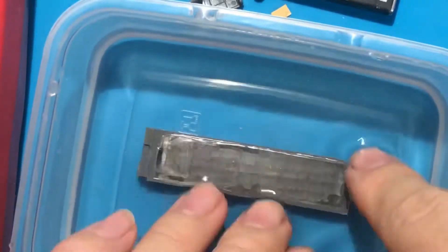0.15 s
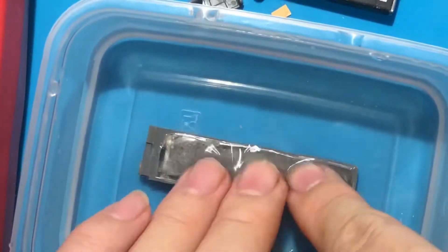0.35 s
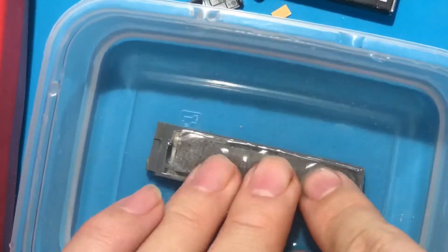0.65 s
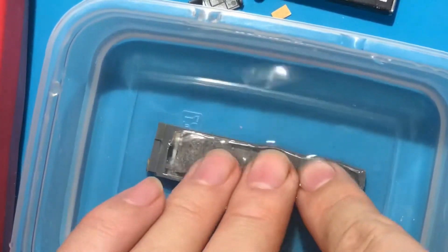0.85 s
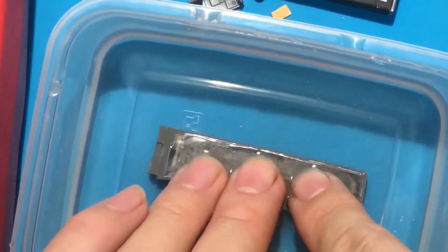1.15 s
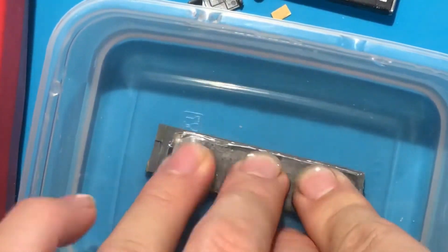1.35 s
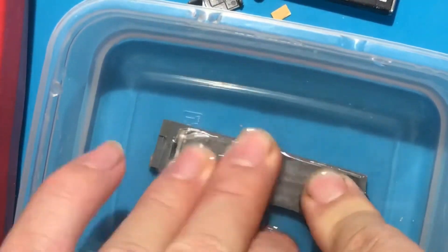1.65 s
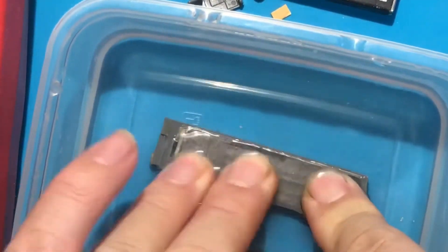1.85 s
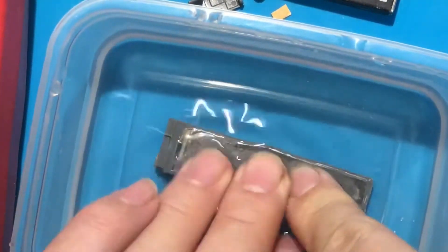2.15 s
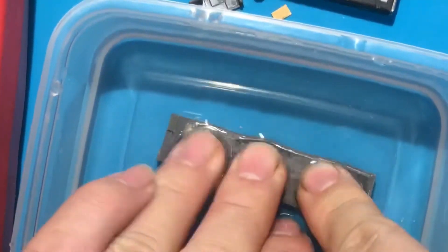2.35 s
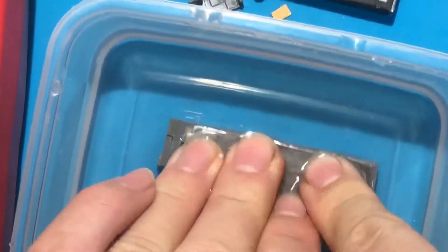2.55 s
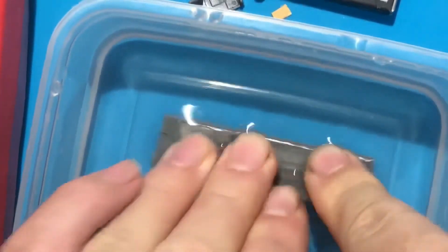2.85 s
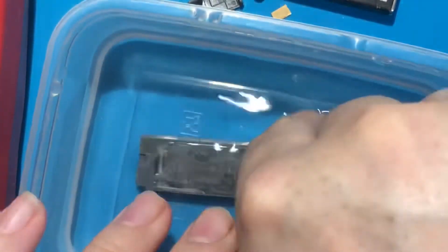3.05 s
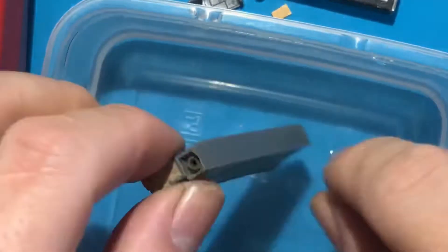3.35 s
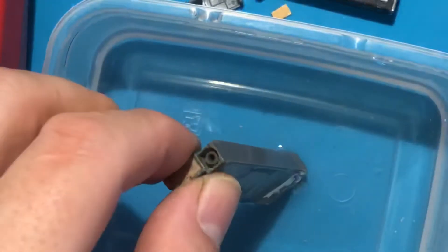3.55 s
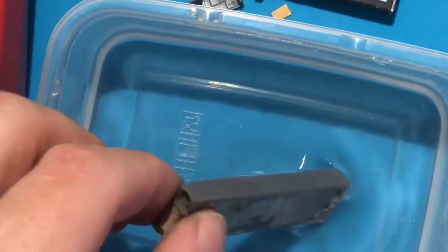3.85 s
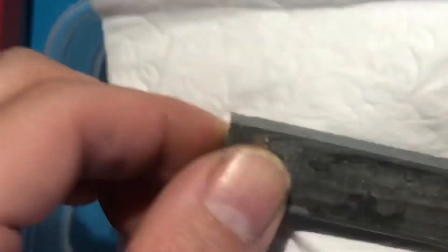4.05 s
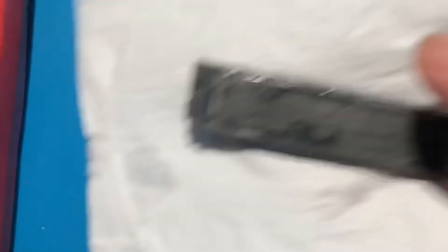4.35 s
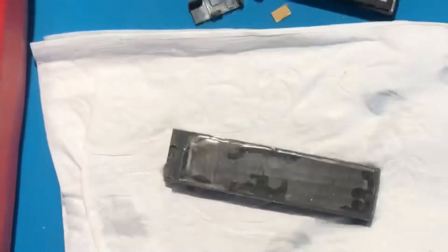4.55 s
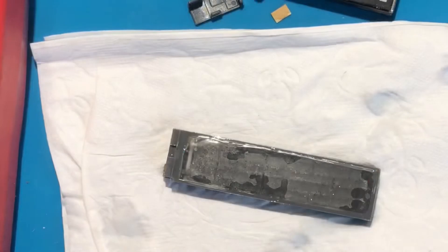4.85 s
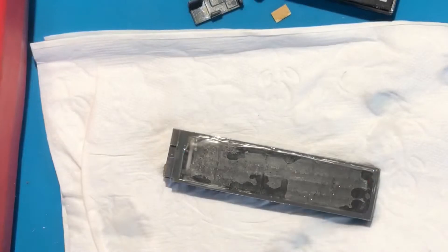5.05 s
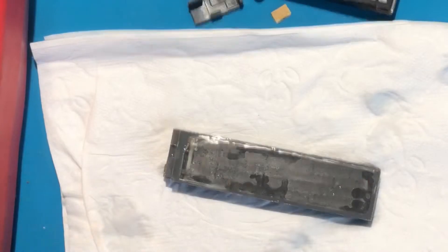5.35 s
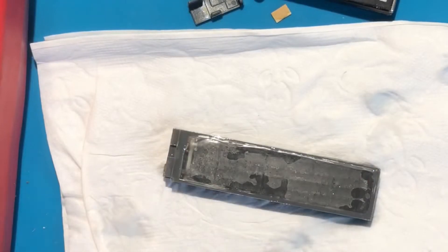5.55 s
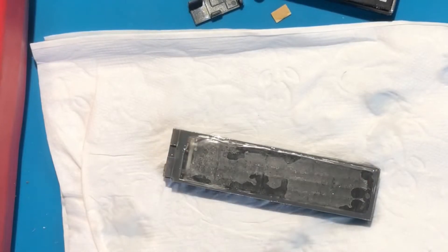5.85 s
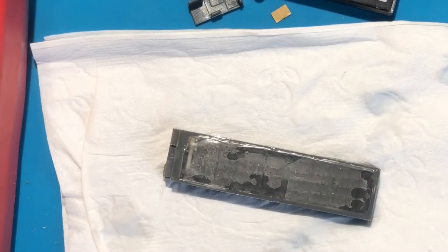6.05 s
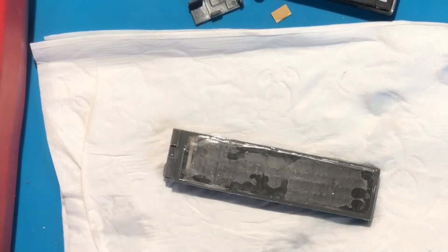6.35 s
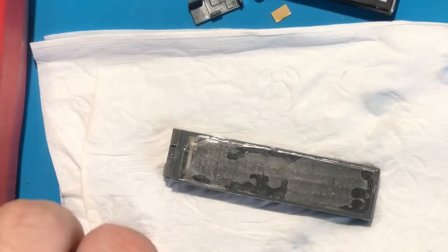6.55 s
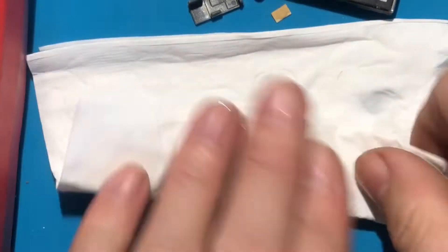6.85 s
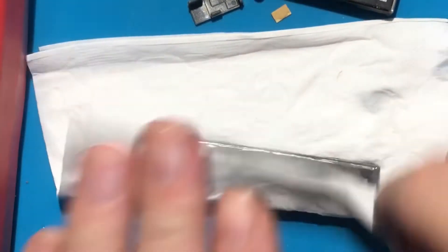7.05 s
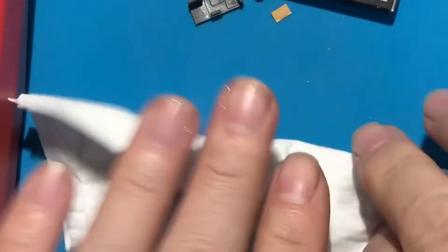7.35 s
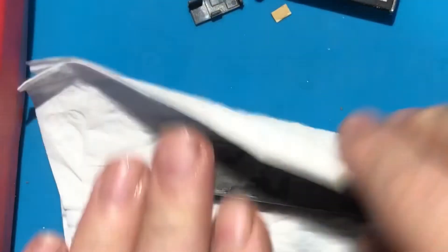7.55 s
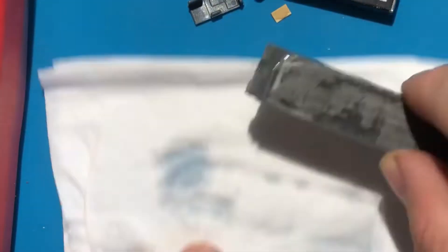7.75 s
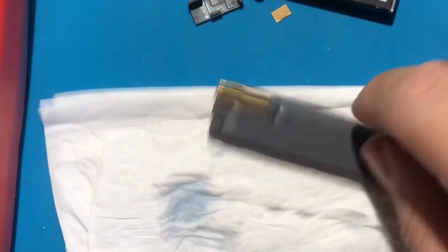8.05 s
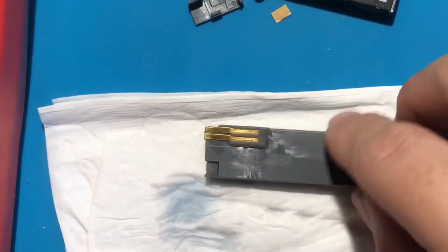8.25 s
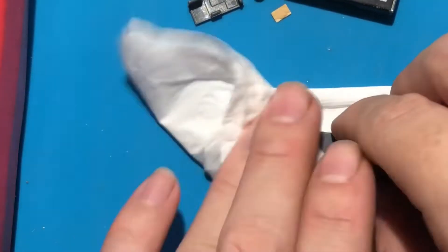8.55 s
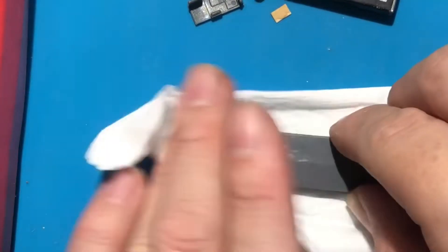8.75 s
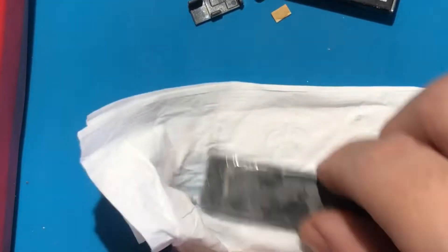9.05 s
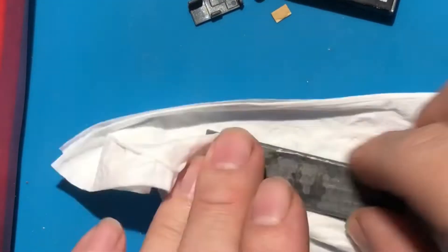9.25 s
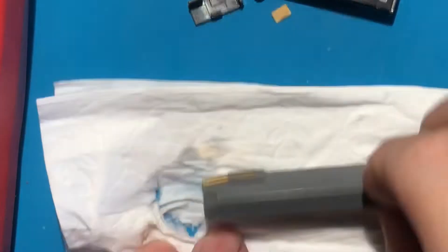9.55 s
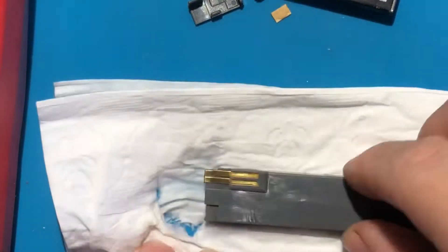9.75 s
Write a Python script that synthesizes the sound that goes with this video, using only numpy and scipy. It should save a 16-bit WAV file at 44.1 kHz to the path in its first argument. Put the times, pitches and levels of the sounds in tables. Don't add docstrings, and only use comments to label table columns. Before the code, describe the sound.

A very quiet, close, dry room with faint low hum and soft hiss. From 0 to 2.9 s wet fingers on a small pack in a plastic tub give barely audible thin ticks, soft skin slips and dull little taps. At 2.9 s a firmer hollow plastic clack and scrape; at 3.3 s a bright tick. Around 3.9-4.1 s wet rubbing, then solid bench thumps with drags at 4.3 and 4.55 s. At 5.04 s a very loud, bright plastic snap, and at 5.38 s a second, duller and more rattling, with a low bump. From 5.7 to 7.5 s come paper crackles, light rustles, knocks at 6.4, 6.6, 6.9 and 7.2 s and a click at 7.5 s. Soft bumps near 8 s, then choppy towel rubbing from 8.4 s, a heavy low thud at 9.03 s, faint squeaks around 9.3-9.5 s and a dull knock at 9.65 s. All sounds are cut short, hurried but unpitched-up.

```python
import sys
import numpy as np
from scipy import signal
from scipy.fft import rfft, irfft
from scipy.io import wavfile
from scipy.ndimage import uniform_filter1d

SR = 44100
rng = np.random.default_rng(int(sys.argv[2]) if len(sys.argv) > 2 else 0)


def decibels_to_gain(level_db):
    exponent = np.asarray(level_db, float) / 20
    return 10 ** exponent


def transcribe(signal):
    frames = np.atleast_2d(signal).T
    limited = np.clip(frames, -1, 1)
    pcm = np.round(limited * 32767).astype(np.int16)
    wavfile.write(sys.argv[1], SR, pcm)


N = 437472

SLICE, FADE, START, HANDOVER = 0.032, 0.0075, 0.011, 0.0058
KEPT = round((SLICE + FADE) * SR)
SLICE_T = np.arange(KEPT) / SR

# freq_hz, level_db_per_hz
ROOM_COLOUR = [(15, -34), (40, -7), (114, -3), (163, -7.5), (226, -7.5), (304, -10), (669, -17),
               (1430, -24.5), (2150, -26.5), (3150, -28), (9000, -32.5), (15800, -32.5)]
# time_s, level_db
ROOM_LEVEL = [(0.0, -80.5), (9.5, -77), (9.92, -78.5)]
# pitch_hz, level_db
HUM_TONES = [(199.2, -73.5), (1470, -94.5)]
# freq_hz, level_db_per_hz
WHINE_COLOUR = [(8650, -120), (9000, -99), (9350, -120)]

# start_s, peak_db
TICK_EVENTS = [(.184, -64), (.3446, -65), (.5686, -64), (.6958, -62), (.8245, -63), (.9517, -62),
               (1.3364, -61), (1.4636, -62), (1.5354, -64), (1.7604, -65), (2.0467, -63), (2.361, -63),
               (2.7447, -65), (6.0716, -60), (0.3122, -60), (0.4394, -61), (0.7592, -62), (1.5928, -60),
               (3.2625, -38), (3.3897, -53.5), (3.5129, -63), (3.8696, -63), (5.7804, -56), (5.7865, -54),
               (5.7947, -52), (5.8024, -54), (5.8138, -53), (5.8296, -54), (6.4108, -58), (6.4582, -65),
               (6.736, -52), (7.5747, -58), (7.535, -64), (8.5634, -63)]
# low_hz, high_hz
WET_TICK_BAND = [13800, 15900]
WET_UNTIL_S = 4

# start_s, hiss_db, tub_db
SLIPS = [(.012, -86, -82), (.044, -82, -76), (.172, -82, -78), (.204, -82, -75.5), (.428, -95, -81),
         (.524, -87, -79), (.844, -92, -78), (.876, -81, -73), (1.036, -85, -70.5), (1.804, -73, -64.5),
         (2.188, -76.5, -74), (2.54, -84, -79), (3.788, -69, -88)]
# freq_hz, level_db_per_hz
SLIP_COLOUR = [(4200, -25), (4900, -9), (6100, -2), (6900, -20)]
# freq_hz, level_db_per_hz
TUB_COLOUR = [(700, -19), (1450, 4.5), (1800, -16), (2120, 0.5), (2700, -21)]

# start_s, peak_db, centre_hz
CRACKLE_EVENTS = [(2.4025, -55, 2050), (2.4035, -62, 5400), (2.4135, -59, 2000), (7.177, -49, 2800),
                  (7.178, -58, 6800), (6.7362, -36, 11000), (5.3915, -36, 3800), (3.328, -58, 9000),
                  (3.3285, -60, 2000), (3.83, -56, 2400), (4.403, -54, 3000), (4.418, -60, 3000),
                  (4.4235, -57, 3200), (4.445, -58, 800), (5.9198, -57, 5000), (5.9448, -52, 7000),
                  (5.982, -55, 6000), (6.1635, -60, 3500), (6.185, -60, 2800), (6.2331, -51, 8000),
                  (6.2495, -51, 7500), (6.2755, -51, 6200), (6.295, -50, 8500), (6.4107, -52, 6500),
                  (6.7125, -58, 13000), (6.8053, -58, 2500), (6.8348, -49, 4700), (6.929, -42, 7000),
                  (7.3137, -61, 12000), (7.34, -60, 8000), (7.354, -60, 2500), (7.4838, -56, 8000),
                  (7.5746, -52, 7200), (7.9936, -64, 11000), (8.9825, -58, 3000), (8.983, -58, 8500),
                  (9.0522, -58, 5000), (9.208, -62, 5200), (9.2468, -64, 4500), (2.9255, -50, 4000),
                  (4.9188, -42, 3000), (6.6846, -41, 4200), (6.0015, -48, 2200), (6.311, -57, 7500),
                  (6.265, -57, 4000), (6.333, -57, 3500), (9.9038, -60, 1200), (8.505, -58, 1500),
                  (9.6459, -58, 4500), (4.205, -60, 1300)]
# start_s, level_db, pitch_hz, overtone_step_db
SQUEAL_EVENTS = [
    (5.1, -54, 1170, -14),
    (9.292, -68, 1370, -1),
    (9.356, -74, 1350, -1),
    (9.388, -72, 1370, -3),
    (9.484, -70, 1340, -2),
    (4.62, -66, 1400, -14),
]
SQUEAL_WIDTH_HZ = 130

# start_s, level_db, pitch_hz
SWAY_EVENTS = [(1.644, -60.5, 78), (4.268, -39.5, 115), (5.42, -50, 110), (6.156, -63, 150),
               (6.668, -54, 130), (6.828, -62, 100), (7.372, -62, 130), (7.436, -60, 140),
               (7.724, -63, 140), (9.644, -58, 60), (9.068, -70, 200), (4.3, -61, 118), (4.556, -40.5, 165),
               (9.516, -58.5, 70), (5.044, -55, 147), (5.132, -54, 45), (5.228, -64, 53), (5.292, -58, 56),
               (5.388, -45.5, 52), (5.42, -39.5, 61.6), (5.452, -58, 39.7), (5.772, -61, 104),
               (5.996, -61.5, 108), (6.412, -55.5, 109), (6.444, -60, 124), (6.508, -60.5, 192),
               (6.7, -53, 211), (6.796, -57.5, 126), (6.929, -52.5, 198), (7.18, -56, 116),
               (7.244, -53.5, 114), (7.276, -46.5, 116), (7.884, -46, 100), (7.948, -54, 42),
               (8.076, -44, 173.5), (8.14, -53, 59.5), (8.844, -56, 47.3), (9.612, -56, 44.7),
               (9.644, -57, 182)]
# freq_hz, level_db_per_hz
LEAN_COLOUR = [(20, -14), (40, 3), (75, -6.5), (120, -1.5), (170, -9), (300, -37)]
# freq_hz, level_db_per_hz
BOARD_COLOUR = [(150, -29), (240, 9), (380, 4.5), (600, -2.5), (1000, -24)]

# start_s, thud_peak_db, thud_hz, shell_peak_db, shell_hz
KNOCK_EVENTS = [(.145, -63, 400, -73, 800), (.44, -69, 300, -68, 1000), (1.361, -70, 450, -69, 790),
                (1.495, -60, 300, -73, 700), (2.021, -61, 350, -65, 744), (0.523, -53, 398, -60, 737),
                (1.791, -52, 314, -64, 696), (2.1311, -53, 318, -69, 710), (2.5304, -57, 328, -63, 825),
                (2.9251, -33, 380, -31.5, 1420), (2.9502, -44.5, 339, -47.5, 1430),
                (3.5847, -54, 404, -56, 960), (4.2745, -30, 300, -44, 1450), (4.266, -40, 200, -56, 700),
                (4.5545, -38, 330, -46, 700), (4.5614, -30, 444, -40.5, 830),
                (5.6373, -49, 527, -53.5, 1580), (6.417, -39, 343, -50.5, 865),
                (6.9286, -40, 222, -68, 1500), (6.5772, -31.5, 407, -50, 1135),
                (7.1763, -39, 318, -42, 1256), (7.1855, -46, 300, -52, 700), (7.171, -50, 250, -62, 900),
                (6.8055, -52, 380, -70, 900), (9.0312, -50, 600, -36, 850), (7.9162, -60.5, 637, -52, 700),
                (8.0775, -41, 290, -56, 900), (9.0339, -20, 345, -46, 912),
                (9.0577, -28.5, 289, -57.5, 705), (9.6503, -34, 263, -75, 1370),
                (4.2935, -35, 150, -56, 700)]
# start_s, crack_peak_db, thud_peak_db, shell_peak_db, shell_hz
CLICK_EVENTS = [(2.386, -62, -57, -55, 1990), (2.7254, -63, -55, -46.5, 1440),
                (2.801, -53.5, -57, -56, 1450), (2.9332, -47.5, -41, -37, 1390),
                (3.2949, -57, -77, -55, 1100), (3.2955, -70, -80, -54, 2900),
                (4.9182, -41, -55, -40.5, 2560), (5.3637, -69.5, -53.5, -46.5, 1700),
                (5.3914, -17, -30, -20, 900), (6.0013, -61, -46, -46.5, 740),
                (6.6842, -48, -42.5, -38, 1500), (6.8344, -63, -69, -64, 2395),
                (6.893, -66, -64, -50, 1150), (6.9292, -50, -70, -69, 2340),
                (7.012, -50.5, -70.5, -58.5, 1750), (7.4974, -35.5, -58.5, -48, 1730)]
KNOCK_CRACK_DB, CLICK_THUD_HZ = -35, 560

# start_s, crack_db, crack_t60_s, rattle_db
SNAP_EVENTS = [
    (5.0436, -4.5, 0.0088, -60.5),
    (5.384, -4, 0.005, -35),
]
# pitch_hz, level_db, t60_s
LID_MODES = [
    [(352, -33, 0.062), (615, -20, 0.036), (878, -16.5, 0.025), (1400, -2.5, 0.009), (1706, -24, 0.017),
     (6270, -48, .015)],
    [(345, -15, 0.034), (720, -22, 0.05), (1050, -16.5, .018), (1892, -24, 0.022), (3160, -31.5, 0.018)],
]
# delay_s, peak_db
CATCH_BLOWS = [
    [(.0003, -17)],
    [(.0004, -13), (.0008, -10), (.0013, -17)],
]
# freq_hz, level_db_per_hz
CRACK_COLOURS = [
    [(1060, -19), (1800, -16), (2430, -14.5), (4290, -2.5), (5440, -8), (6300, 2), (7420, -13), (8670, -4),
     (12600, -12.5), (16000, -8.5)],
    [(880, -30.5), (1500, -14), (4000, -1), (5400, 0), (7610, 3), (8300, 2), (8700, -12.5), (10900, -20),
     (11900, -20.5), (16000, -26.5)],
]

# freq_hz, level_db_per_hz
FIBRE_COLOUR = [(900, -24), (1700, -7), (2600, 0), (4200, -2.5), (5800, -4.5), (7500, -23.5)]
# freq_hz, level_db_per_hz
CRINKLE_COLOUR = [(4500, -26.5), (6300, -1.5), (10000, -2.5), (15600, -2.5), (16000, -6)]
# start_s, end_s, fibres_db, crinkle_db
STROKE_EVENTS = [(3.87, 3.9, -73, -75), (4.1, 4.15, -72, -77), (4.32, 4.42, -78, -78),
                 (4.45, 4.52, -73, -72), (4.52, 4.54, -72, -68), (5.76, 5.82, -68, -72),
                 (5.92, 5.98, -69, -71), (6.21, 6.33, -66.5, -68.5), (6.34, 6.43, -73.5, -76.5),
                 (7.58, 7.64, -73, -74.5), (8.19, 8.25, -83.5, -78), (8.42, 8.51, -75, -71),
                 (6.69, 6.71, -80, -80), (9.475, 9.5, -67.5, -71), (9.51, 9.6, -81, -80),
                 (8.74, 8.8, -73, -74), (8.93, 9.06, -74, -72), (9.34, 9.4, -71.5, -78),
                 (9.41, 9.47, -73.5, -75.5)]
# start_s, fibres_db, crinkle_db
WET_RUB_EVENTS = [(0.044, -77.5, -75.5), (1.804, -75.5, -73), (2.188, -79, -84), (2.7, -80, -80),
                  (2.924, -68, -86), (3.308, -76.5, -76), (3.82, -75, -80), (3.948, -60, -62.5),
                  (3.98, -77.5, -77), (4.044, -70, -71), (3.916, -70, -70), (4.076, -58, -66)]
# start_s, fibres_db, crinkle_db
DRY_RUB_EVENTS = [(4.919, -61, -70), (5.044, -52, -50), (5.133, -66, -75), (5.26, -70.5, -70),
                  (5.42, -61.5, -70), (5.868, -68, -74), (5.996, -61.5, -69.5), (6.028, -68.5, -71.5),
                  (6.156, -73.5, -81), (6.476, -66, -72), (6.636, -71, -75), (6.685, -62, -76),
                  (6.732, -56, -49), (6.828, -67.5, -70), (6.86, -71, -73), (6.929, -59, -65),
                  (7.116, -73.5, -74), (7.18, -82, -72), (7.148, -75, -79), (7.308, -78, -73),
                  (7.34, -80, -78), (6.796, -77, -86), (6.892, -77, -78), (6.956, -80, -79),
                  (5.836, -76, -80), (8.012, -84, -79), (7.98, -84, -82), (8.076, -80, -80),
                  (8.524, -81, -80), (8.716, -79, -80), (9.164, -78, -80), (9.196, -75, -78),
                  (9.228, -80, -80), (9.26, -78, -80), (9.324, -79, -82), (4.876, -78, -84),
                  (4.3, -82, -78), (7.372, -74, -76), (7.436, -63, -63.5), (7.82, -79, -70.5),
                  (8.268, -78.5, -70), (8.556, -65.5, -69), (8.62, -63.5, -67), (8.684, -72, -75),
                  (8.812, -61, -61.5), (8.844, -67.5, -67), (9.132, -72, -74.5), (5.919, -74, -74),
                  (9.292, -66, -73.5)]
# start_s, body_db, body_hz, board_db
SCRAPE_EVENTS = [(0.62, -69, 1280, -87), (2.387, -72, 1000, -72), (2.796, -65, 1490, -70),
                 (2.892, -65, 1380, -72), (2.924, -55.5, 1050, -46.5), (2.988, -71, 1230, -85),
                 (8.62, -65, 700, -66), (4.076, -59, 1050, -61), (4.268, -47, 600, -47),
                 (4.268, -55, 1400, -80), (4.556, -52, 720, -48), (4.62, -68, 1240, -75),
                 (4.332, -76, 800, -70), (4.396, -74, 900, -71), (4.428, -74, 700, -69),
                 (4.919, -61, 890, -56), (5.044, -43, 1210, -42.5), (5.1, -62, 1700, -68),
                 (5.132, -59, 950, -73), (5.207, -64, 774, -84), (5.228, -54.5, 930, -67),
                 (5.26, -57.5, 840, -55), (5.42, -58.5, 765, -65), (5.804, -64, 850, -75),
                 (5.836, -62, 770, -85), (5.996, -54, 750, -58), (6.028, -64, 785, -82),
                 (6.412, -68, 775, -53.5), (6.5755, -53, 1050, -45.5), (6.671, -62, 880, -59),
                 (6.7, -51, 715, -53.5), (7.18, -69, 1000, -66), (6.7, -63, 2000, -80),
                 (6.156, -73, 800, -68), (5.74, -77, 800, -70), (6.028, -80, 800, -64),
                 (3.916, -70, 900, -70), (8.14, -73, 800, -80), (8.076, -64.5, 748, -58.5),
                 (8.812, -60, 700, -65.5)]
# start_s, body_change_db, paper_change_db
SWELL_EVENTS = [(3.884, 3, 4), (3.916, 6, 4), (3.98, -4, -8), (4.044, 14, 24), (4.076, 6, -1),
                (4.268, -10, -6), (4.396, -1, -6), (4.556, -10, -5), (5.1, 12, 4), (5.132, -6, -17),
                (5.228, 3, 8), (5.26, -5, -5), (5.42, -10, -7), (5.868, -7, -10), (5.964, 6, 1),
                (5.996, -10, -4), (6.028, -14, -11), (6.156, -6, 4), (6.412, -14, -7), (6.476, 8, -3),
                (6.572, 10, 12), (6.636, -4, -14), (6.7, -3, -8), (6.732, -3, -15), (6.828, 0, -3),
                (6.86, -4, -14), (7.18, -28, -20), (7.436, 0, -9), (7.596, 3, -5), (8.076, -6, 1),
                (8.556, 6, 3), (8.972, 3, -10), (9.132, -2, -11), (7.308, 0, 5), (8.844, -4, -3),
                (9.292, -2, -3), (2.924, -6, -6), (2.796, -4, -4)]
STROKE_SCATTER_DB = 1.3
RUB_BODY_DB, RUB_BODY_HZ, RUB_BODY_SPREAD = -3, 1250, 0.16
SCRAPE_FIBRES_DB, SCRAPE_CRINKLE_DB, SWAY_BOARD_DB = -22.5, -25, -27
SPIKES_PER_S, SPIKE_DB, SPIKE_T60 = 120, -5, 0.003


def along(points, hz):
    f, v = np.transpose(points)
    return np.interp(np.log(hz + 1), np.log(f + 1), v, left=-120, right=-120)


def unit(x):
    return x / np.sqrt(np.mean(x ** 2, axis=-1, keepdims=True) + 1e-20)


def smooth(shape, size):
    return unit(uniform_filter1d(rng.standard_normal(shape), size))


def noise(count, spectrum, peaky_db, grain_db, size=4096):
    colour_db = along(spectrum, np.fft.rfftfreq(size, 1 / SR))
    gain = decibels_to_gain(colour_db + peaky_db * smooth((count, size // 2 + 1), size=40))
    grains = rng.standard_normal((count, size)) * decibels_to_gain(grain_db * smooth((count, size), size=60))
    return irfft(rfft(grains) * gain)


def noise_slices(count, spectrum, peaky_db, grain_db):
    return unit(noise(count, spectrum, peaky_db, grain_db)[:, :KEPT])


def hump(hz, width, peaky_db, grain_db):
    shape = [(hz / width ** 4, -36), (hz / width, -8), (hz, 0), (hz * width, -14), (hz * width ** 4, -56)]
    return noise_slices(1, shape, peaky_db, grain_db)[0]


def ring(hz, t60, t):
    return decibels_to_gain(-60 * t / t60) * np.sin(2 * np.pi * hz * t)


def click(colour, size=4096):
    cepstrum = irfft(np.log(decibels_to_gain(along(colour, np.fft.rfftfreq(size, 1 / SR)))))
    cepstrum[1:size // 2] *= 2
    cepstrum[size // 2 + 1:] = 0
    pulse = irfft(np.exp(rfft(cepstrum)))[:KEPT]
    return pulse / np.abs(pulse).max()


def splice(slices, starts):
    starts = np.asarray(starts)
    joint = START + SLICE * np.floor((starts - START + FADE) / SLICE)
    late = (starts - joint)[:, None]
    dying = np.clip((SLICE_T - late) / 0.002, 0, 1) * decibels_to_gain(9 - 60 * (SLICE_T - late) / 0.09)
    tail = np.where(late > FADE / 2, dying, 1)
    fade = np.clip(np.minimum(SLICE_T, SLICE + FADE - SLICE_T) / FADE, 0, 1) * tail
    at = np.round((joint + SLICE) * SR).astype(int)[:, None] + np.arange(KEPT)
    track = np.bincount(at.ravel(), (slices[:, :KEPT] * fade).ravel(), N + SR)
    return track[round(SLICE * SR):][:N]


def add(track, s, sound):
    end = START + SLICE * np.ceil((s - START - HANDOVER) / SLICE) + FADE
    t = s + np.arange(len(sound)) / SR
    track[round(s * SR):][:len(sound)] += sound * np.clip((end - t) / FADE, 0, 1)


def slice_index(s):
    return np.floor((np.asarray(s) - START + FADE) / SLICE)


def swell(starts, column):
    table = np.array(SWELL_EVENTS)
    same_slice = slice_index(starts)[:, None] == slice_index(table[:, 0])
    change_db = same_slice @ table[:, column]
    return decibels_to_gain(change_db[:, None] * np.linspace(-0.5, 0.5, KEPT))


def room():
    s = START + SLICE * np.arange(-1, int(N / SR / SLICE))
    raw = noise(len(s), ROOM_COLOUR, peaky_db=0.4, grain_db=0.6)
    level = decibels_to_gain(np.interp(s, *np.transpose(ROOM_LEVEL)) + 9.0 + 0.41 * rng.standard_normal(len(s)))
    hiss = level[:, None] * raw[:, :KEPT] / raw.std()
    hum = 0
    for hz, db in HUM_TONES:
        phase = np.cumsum(rng.normal(0, 1.0, (len(s), 1)), 0)
        hum = hum + decibels_to_gain(db + 2.5) * np.sin(2 * np.pi * hz * (s[:, None] + SLICE_T) + phase)
    wander = decibels_to_gain(2.5 * smooth(len(s), size=6))[:, None]
    whine = wander * noise(len(s), WHINE_COLOUR, peaky_db=0, grain_db=0) / raw.std()
    return splice(hiss + hum + whine[:, :KEPT], s)


def bumps():
    steps = np.arange(START, N / SR, SLICE)
    lean_level = decibels_to_gain(rng.normal(-76.5, 5, (len(steps), 1)))
    leans = lean_level * noise_slices(len(steps), LEAN_COLOUR, peaky_db=2.0, grain_db=-2)
    s, sway_db, sway_hz = np.transpose(SWAY_EVENTS)
    sway = decibels_to_gain(sway_db)[:, None] * [hump(hz, width=1.6, peaky_db=-3.5, grain_db=-0.6) for hz in sway_hz]
    dragged, _, _, board_db = np.transpose(SCRAPE_EVENTS)
    nudge_db = rng.normal(-84.5, 3.9, len(steps))
    at = np.concatenate([dragged, s, steps])
    boom_db = np.concatenate([board_db, sway_db + SWAY_BOARD_DB, nudge_db])
    board = noise_slices(len(at), BOARD_COLOUR, peaky_db=7.5, grain_db=0.3)
    boom = decibels_to_gain(boom_db)[:, None] * board * swell(at, 1)
    return splice(sway, s) + splice(leans, steps) + splice(boom, at)


def ticks():
    track, t = np.zeros(N + SR), np.arange(KEPT // 4) / SR
    steps = np.arange(START + 0.046, N / SR, 2 * SLICE)
    faint = np.transpose([steps, -75 + 2.2 * rng.standard_normal(len(steps))])
    narrow = signal.butter(3, WET_TICK_BAND, "band", fs=SR, output="sos")
    for k, (s, db) in enumerate([*TICK_EVENTS, *faint]):
        white = rng.standard_normal(len(t) + 3)
        hiss = np.diff(white, 3)
        if s < WET_UNTIL_S or k >= len(TICK_EVENTS):
            hiss = signal.sosfilt(narrow, white)[3:] + 0.015 * hiss
        add(track, s + 0.0004, decibels_to_gain(db - 0.4 - 60 * t / 0.0038) * unit(hiss))
    return track[:N]


def squeaks():
    s, hiss_db, tub_db = np.transpose(SLIPS)
    hiss = decibels_to_gain(hiss_db)[:, None] * noise_slices(len(s), SLIP_COLOUR, peaky_db=1.5, grain_db=2.5)
    tub = decibels_to_gain(tub_db)[:, None] * noise_slices(len(s), TUB_COLOUR, peaky_db=1.5, grain_db=4)
    steps = np.arange(START, 3.2, SLICE)
    stir_level = decibels_to_gain(rng.normal(-86.5, 3.2, (len(steps), 1)))
    stir = stir_level * noise_slices(len(steps), TUB_COLOUR, peaky_db=2.5, grain_db=5)
    return splice(hiss + tub, s) + splice(stir, steps)


def crackles():
    track = np.zeros(N + SR)
    for s, db, hz in CRACKLE_EVENTS:
        burst = hump(hz, width=1.7, peaky_db=1.5, grain_db=0.5)
        shape = decibels_to_gain(db + 3.5 - 60 * SLICE_T / 0.006) * (1 - np.exp(-SLICE_T / 0.0004))
        add(track, s, shape * burst)
    return track[:N]


def squeals():
    hz = np.fft.rfftfreq(KEPT, 1 / SR)
    combs = []
    for _, _, pitch_hz, step_db in SQUEAL_EVENTS:
        peaks = [decibels_to_gain(step_db * k) / (1 + ((hz - pitch_hz * (k + 1)) / SQUEAL_WIDTH_HZ) ** 2) for k in range(4)]
        combs.append(sum(peaks))
    s, db, _, _ = np.transpose(SQUEAL_EVENTS)
    sound = unit(irfft(rfft(rng.standard_normal((len(s), KEPT))) * combs, KEPT))
    return splice(decibels_to_gain(db)[:, None] * swell(s, 1) * sound, s)


def taps():
    track, t = np.zeros(N + SR), SLICE_T
    dull = [(s, shell_db + KNOCK_CRACK_DB, thud_db, thud_hz, shell_db, hz)
            for s, thud_db, thud_hz, shell_db, hz in KNOCK_EVENTS]
    bright = [(s, crack_db, thud_db, CLICK_THUD_HZ, shell_db, hz)
              for s, crack_db, thud_db, shell_db, hz in CLICK_EVENTS]
    for s, crack_db, thud_db, thud_hz, shell_db, shell_hz in dull + bright:
        thud = ring(thud_hz, 7 / thud_hz, t) * (1 - np.exp(-t * thud_hz / 0.46))
        rattle = hump(shell_hz, width=1.9, peaky_db=-2.5, grain_db=5.0) * decibels_to_gain(-60 * t / 0.015)
        shell = (ring(shell_hz, 14 / shell_hz, t) + 0.5 * rattle) * (1 - np.exp(-t / 0.0016))
        white = rng.standard_normal(KEPT + 1)
        crack = uniform_filter1d(white[1:] - 0.52 * white[:-1], size=2) * decibels_to_gain(-60 * t / 0.025)
        tap = decibels_to_gain(thud_db + 8) * thud + decibels_to_gain(shell_db + 11) * shell + decibels_to_gain(crack_db - 5.5) * crack
        add(track, s + 0.0008, tap)
    return track[:N]


def snaps():
    track, t = np.zeros(N + SR), SLICE_T
    for (s, db, t60, rattle_db), modes, colour, blows in zip(SNAP_EVENTS, LID_MODES, CRACK_COLOURS, CATCH_BLOWS):
        hiss = noise_slices(1, colour, peaky_db=1.2, grain_db=0.1)[0]
        tear = decibels_to_gain(db - 7.0 - 60 * t / t60) * (1 - np.exp(-t / 0.0014))
        rattle = decibels_to_gain(rattle_db - 60 * t / 0.12)
        body = sum(decibels_to_gain(level) * ring(hz, decay, t) for hz, level, decay in modes)
        add(track, s, hiss * (tear + rattle))
        add(track, s + 0.0002, body * (1 - np.exp(-(t / 0.0008) ** 2)))
        for late, blow_db in blows:
            add(track, s + late, decibels_to_gain(blow_db) * click(colour))
    return track[:N]


def rubs():
    steps = np.arange(START, N / SR, SLICE) + 0.001
    uneven_db = STROKE_SCATTER_DB * rng.standard_normal((2, len(steps)))
    power = np.zeros((2, len(steps)))
    for start, end, fibre_db, crinkle_db in STROKE_EVENTS:
        power += ((steps > start) & (steps < end)) * decibels_to_gain([[fibre_db], [crinkle_db]]) ** 2
    strokes = np.transpose([steps, *(10 * np.log10(power + 1e-14) + uneven_db)])
    s, fibre_db, crinkle_db = np.transpose([*WET_RUB_EVENTS, *DRY_RUB_EVENTS, *strokes[power[0] > 0]])
    body_hz = RUB_BODY_HZ * np.exp(RUB_BODY_SPREAD * rng.standard_normal(len(s)))
    light = [s, fibre_db + RUB_BODY_DB, body_hz, fibre_db, crinkle_db]
    s, db, hz, _ = np.transpose(SCRAPE_EVENTS)
    return np.hstack([light, [s, db, hz, db + SCRAPE_FIBRES_DB, db + SCRAPE_CRINKLE_DB]])


def rustle():
    s, body_db, body_hz, fibre_db, crinkle_db = rubs()
    body = np.array([hump(hz, width=1.6, peaky_db=2.2, grain_db=2.5) for hz in body_hz])
    fibres = noise_slices(len(s), FIBRE_COLOUR, peaky_db=2.2, grain_db=0.3)
    crinkle = noise_slices(len(s), CRINKLE_COLOUR, peaky_db=2.9, grain_db=-2.2)
    spike_level = decibels_to_gain(SPIKE_DB + 2.5 * rng.standard_normal(fibres.shape))
    spikes = (rng.random(fibres.shape) < SPIKES_PER_S / SR) * spike_level
    spikes = signal.lfilter([1], [1, -decibels_to_gain(-60 / SPIKE_T60 / SR)], spikes)
    flutter_db = 2.0 * smooth(fibres.shape, size=30) + 0.43 * smooth(fibres.shape, size=400)
    crackle = unit(decibels_to_gain(flutter_db) + spikes)
    paper = decibels_to_gain(fibre_db)[:, None] * fibres + decibels_to_gain(crinkle_db)[:, None] * crinkle
    return splice(decibels_to_gain(body_db)[:, None] * body * swell(s, 1) + crackle * paper * swell(s, 2), s)


def scene():
    background = room() + bumps() + ticks() + squeaks() + crackles() + squeals()
    return (background + taps() + snaps() + rustle())[None]


def band_limit(x):
    return signal.sosfilt(signal.butter(12, 16900, fs=SR, output="sos"), x)


def record(dry):
    bass_cut = signal.butter(2, 27, "high", fs=SR, output="sos")
    treble_cut = signal.butter(10, 16300, fs=SR, output="sos")
    mix = signal.sosfilt(np.vstack([bass_cut, treble_cut]), dry)
    return band_limit(mix)


dry = scene()
out = record(dry)
transcribe(out)
```